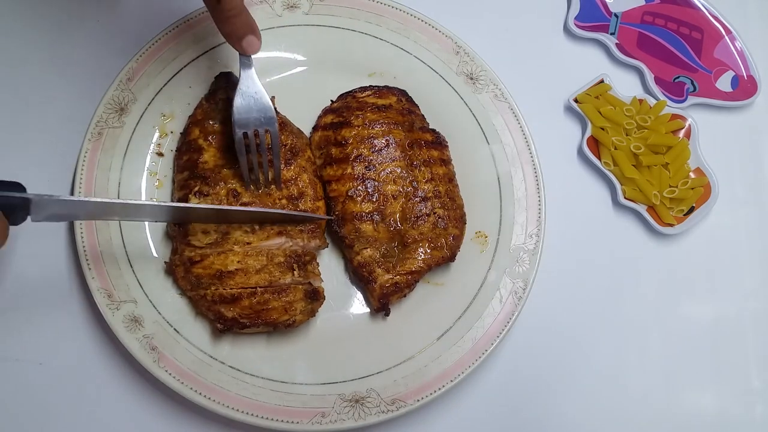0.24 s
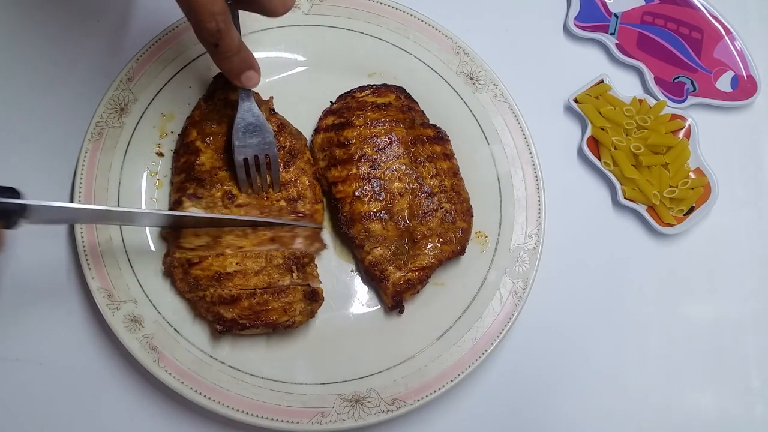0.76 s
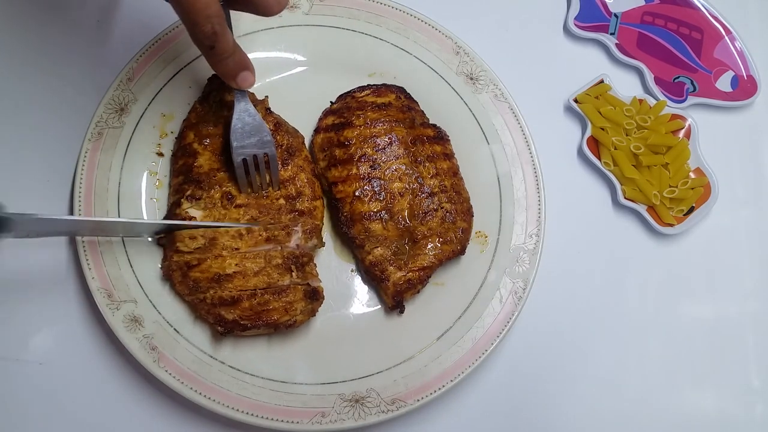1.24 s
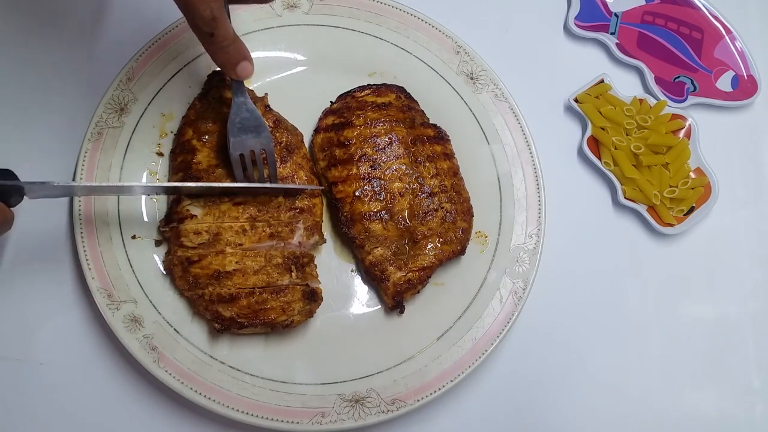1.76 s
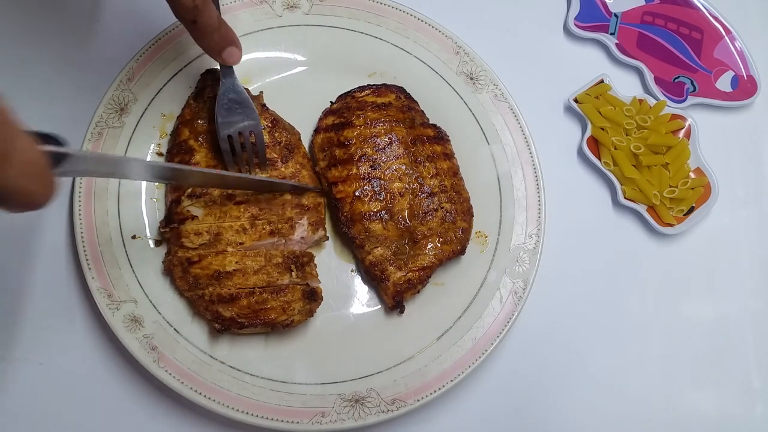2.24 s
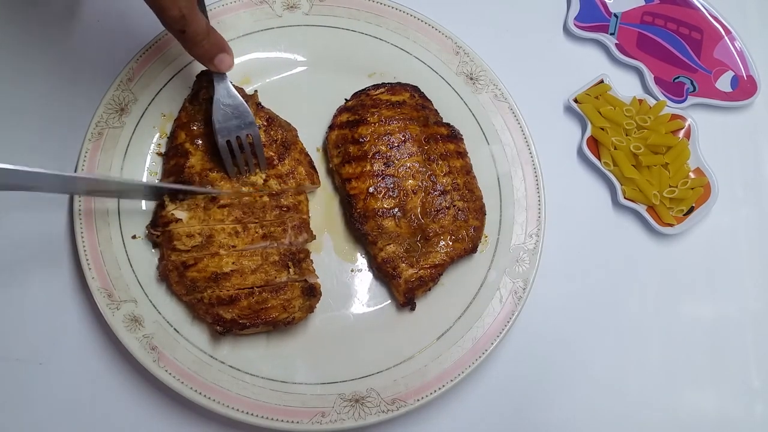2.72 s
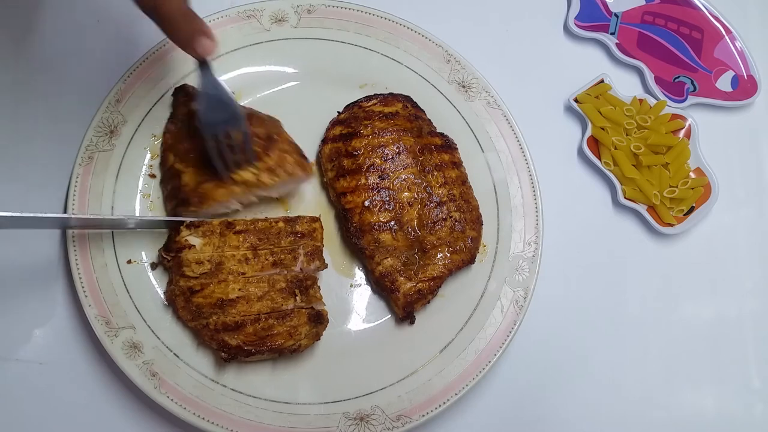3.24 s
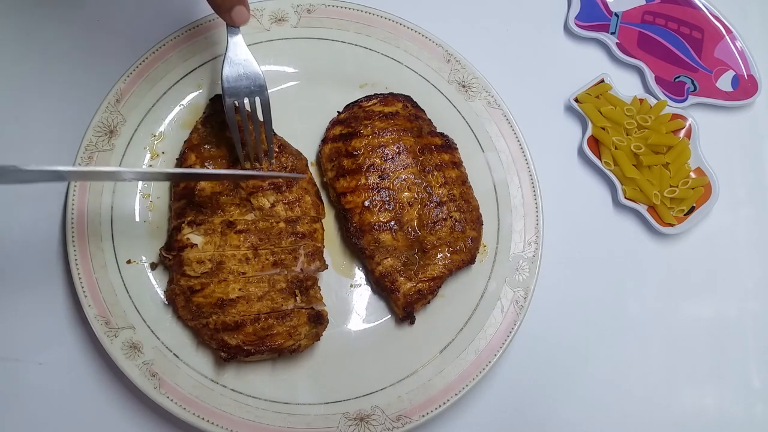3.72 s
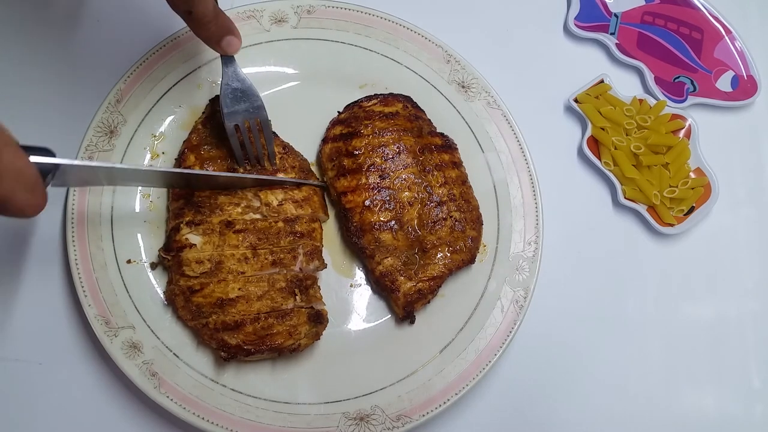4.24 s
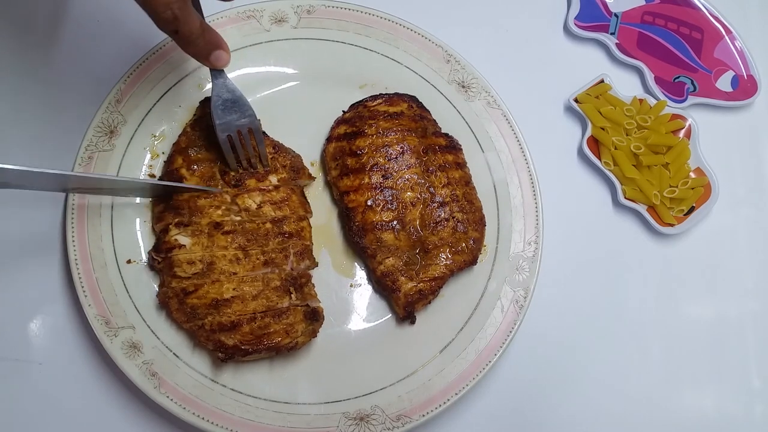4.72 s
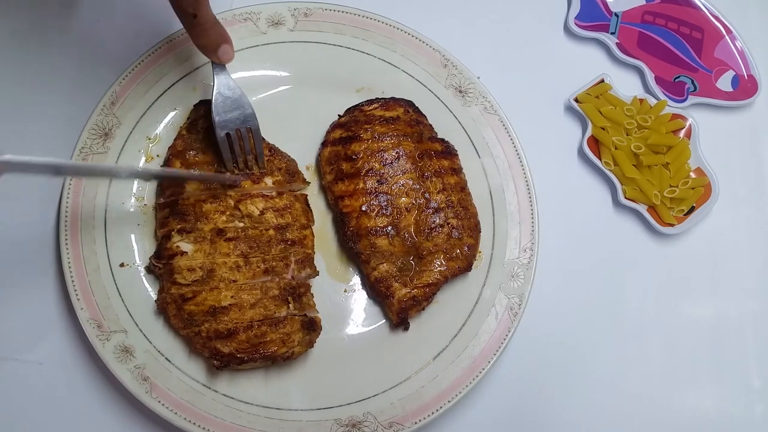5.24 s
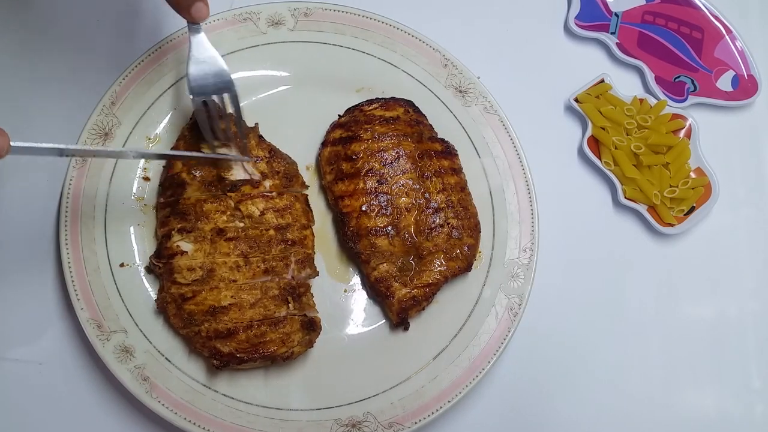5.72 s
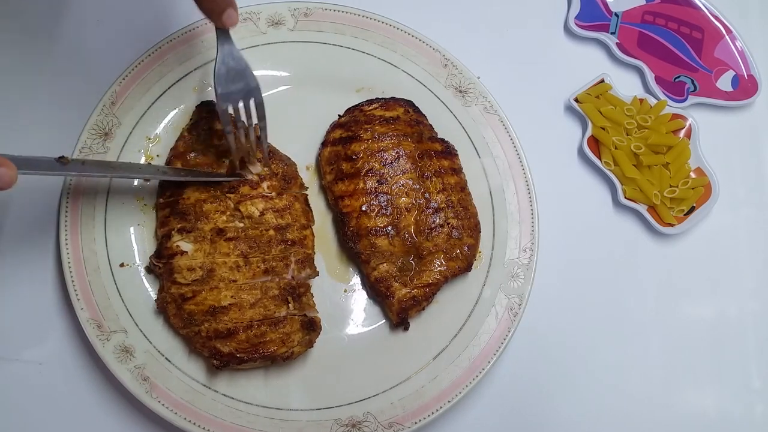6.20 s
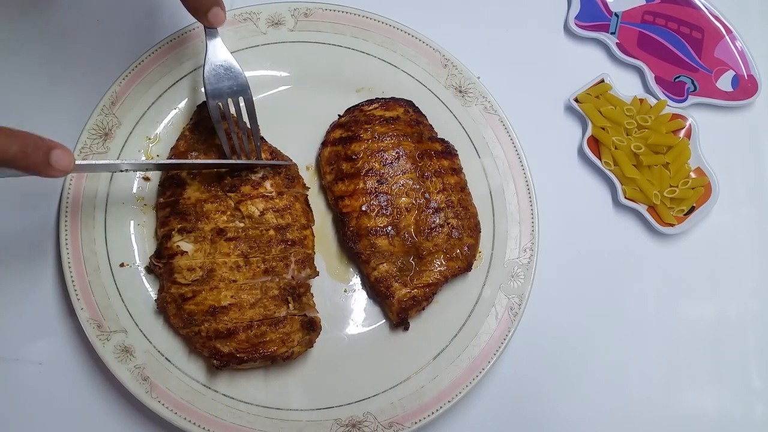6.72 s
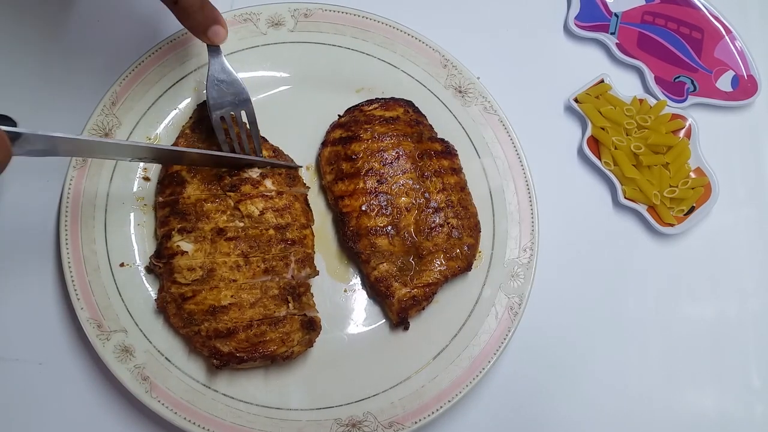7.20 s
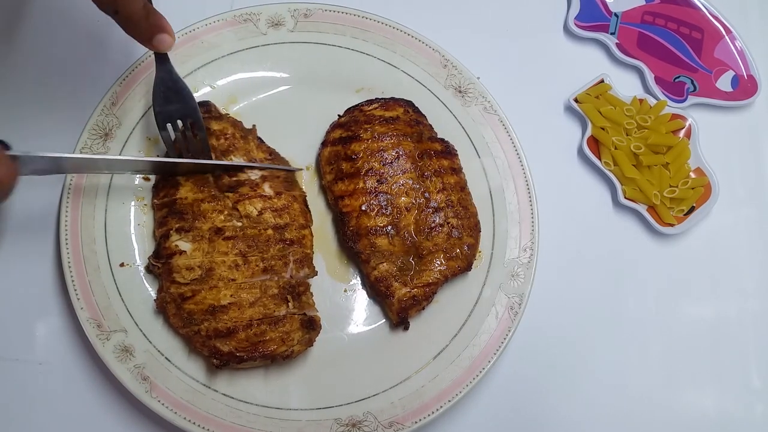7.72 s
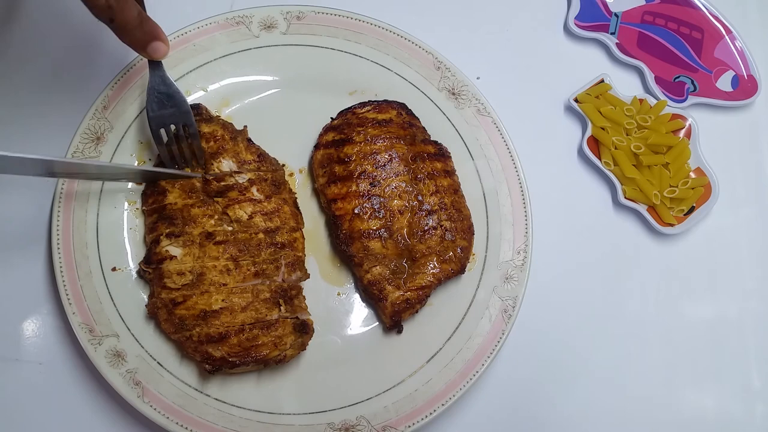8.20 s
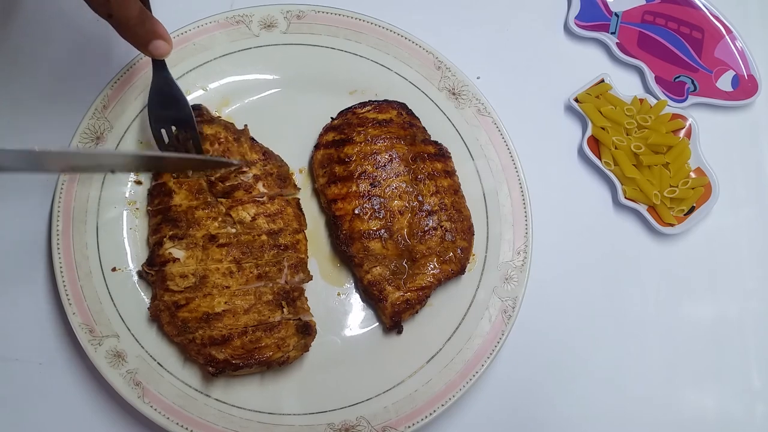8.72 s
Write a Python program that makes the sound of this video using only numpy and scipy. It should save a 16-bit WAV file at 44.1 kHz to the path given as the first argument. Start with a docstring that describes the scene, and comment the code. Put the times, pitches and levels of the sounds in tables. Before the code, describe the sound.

A knife and fork work on cooked chicken on a plate, heard closely with a little bright room echo. Fast rasping saw strokes and ceramic clinks come first, then a near-pause with faint steel ticks over a steady low motor hum and soft air. Quiet cutting resumes with wet snaps, short scrapes, small clinks and dull blade taps, ending on a sharp, heavy knock against the plate's rim.

```python
"""Sawing cooked chicken on a plate

A table knife saws through cooked chicken on a ceramic plate, close by, in a hard-walled kitchen.
Its teeth make strings of tiny clicks that hiss and ring; clinks, taps, fork ticks and a late hard knock
on the rim are fading tones, mostly with a crack of noise. Noise bursts make wet snaps, gliding tones squeaks.
A fan motor hums underneath as steady tones over a rush of air."""
import sys
import numpy as np
from scipy import signal
from scipy.fft import rfft, irfft, next_fast_len
from scipy.io import wavfile

SR = 44100
rng = np.random.default_rng(int(sys.argv[2]) if len(sys.argv) > 2 else 0)


def store_pcm(level_fs):
    """Save levels as 16-bit WAV."""
    pcm = np.round(np.clip(level_fs, -1, 1) * 32767).astype(np.int16)
    wavfile.write(sys.argv[1], SR, np.atleast_2d(pcm).T)


N = 394694
TIME = np.arange(N) / SR
AGE = TIME[:SR // 2]  # seconds since a blow, up to half a second

# All table levels are relative: the functions mix and trim them. A fade time is the time to drop 60 dB.
# strokes of the knife: (start [s], length [s], hiss of teeth [dB], rasp of blade [dB], ring of plate [dB])
STROKES = [(0, 0.032, -63.5, -55, -58), (0.123, 0.029, -66, -58.5, -51), (0.279, 0.04, -60.5, -49.5, -52),
           (0.421, 0.069, -67.5, -55, -51.5), (0.608, 0.049, -53, -43.5, -53),
           (0.748, 0.027, -56, -47.5, -47), (0.884, 0.038, -56.5, -47, -52.5), (1.02, 0.12, -75, -68, -68),
           (3.706, 0.033, -76, -78, -80), (4.03, .04, -77, -78, -80), (4.456, 0.042, -84, -62.5, -74),
           (4.82, 0.058, -76, -83, -82), (5.305, .045, -67.5, -71, -72), (5.385, .03, -75, -54, -57),
           (5.528, 0.015, -72, -48, -60), (6.46, 0.19, -80, -65.5, -72), (7.996, 0.026, -78, -63, -70),
           (8.39, 0.081, -82, -66, -63)]
# blade staying in the meat between strokes: (start [s], end [s], hiss [dB], rasp [dB])
CUTS = [(0, 1.2, -78, -80), (3.7, 6.3, -78, -78), (7.7, 8.65, -80, -85)]
# blade pressed on the plate: (pitch [Hz], level [dB], fade time [s])
BLADE_MODES = [(2164, 3, 0.012), (2430, 2, 0.03), (2790, -9.5, 0.031), (3410, -4, 0.012),
               (4340, -21, 0.035), (5100, -26, 0.011)]
# the plate's ring under the teeth: (pitch [Hz], level [dB], fade time [s])
GLAZE_MODES = [(1483, 0, 0.043)]
# rasp of the teeth: (frequency [Hz], level per Hz [dB])
RASP_COLOUR = [(600, 6.5), (1200, -2), (2400, 8), (3100, -25), (3500, -19), (4700, -19), (7000, -29),
               (12000, -40)]
# hiss of the teeth: (frequency [Hz], level per Hz [dB])
HISS_COLOUR = [(3000, -25), (5500, -10.5), (7000, -17), (8200, -1.5), (8800, -5.5), (9700, -3.5),
               (11400, -9.5), (12500, -6.5), (14300, -8), (16000, -16)]
# cutlery striking bare glaze:
# (time [s], level [dB], contact [s], favoured pitch [Hz], weight [dB], brightness [dB])
CLINKS = [(0.7537, -25, 0.0057, 1590, -0.5, 0.5), (0.81, -32, .0026, 1670, -3, -0.5),
          (0.9896, -29, 0.0035, 2600, -2, -1), (1.312, -39.5, 0.0032, 1600, -3, -12.5),
          (1.761, -52, .0044, 2380, -5, 1.5), (5.349, -40, 0.0019, 2770, 9, 2),
          (5.555, -50, 0.002, 2230, -4, 7), (5.688, -40, .006, 1560, -1, 2.5),
          (5.942, -46, 0.0045, 2500, 5, 9), (8.176, -37.5, 0.0037, 2090, 11, -4.5)]
# the plate, damped by the meat: (pitch [Hz], level [dB], fade time [s])
PLATE_MODES = [(667, -16.5, 0.031), (1210, -9, 0.065), (1455, -2.5, 0.051), (1521, -6.5, 0.035),
               (1660, -14.5, 0.041), (1797, -8, 0.028), (1958, -5.5, 0.046), (2053, -8.5, 0.061),
               (2282, -4, 0.028), (2514, -9, 0.059), (2600, -10.5, 0.029), (2747, -18, 0.092),
               (2890, -12, 0.054), (3604, -13, 0.05), (4560, -22, 0.033), (5300, -28.5, 0.045),
               (6700, -34.5, 0.044), (8070, -34.5, .09)]
# crack of steel on glaze: (frequency [Hz], level per Hz [dB])
CLINK_COLOUR = [(150, -15), (600, 6.5), (1000, 2), (1700, -12), (2700, -2.5), (3200, -8), (4300, -17.5),
                (5500, -31), (10000, -29), (16000, -34)]
# blade tapping down through the meat, which mutes the plate: (time [s], level [dB])
TAPS = [(3.7858, -47), (4.149, -55), (6.0806, -51), (6.123, -47), (6.2931, -51), (6.6074, -54),
        (6.6388, -51), (7.8625, -52), (7.9992, -49), (8.08, -46), (8.1309, -42), (8.1404, -49),
        (8.4487, -49), (8.541, -48), (8.5744, -51), (8.6617, -53)]
# the muted blade: (pitch [Hz], level [dB], fade time [s])
TAP_MODES = [(2000, -1, .012), (2290, -0.5, 0.015), (2760, -7, 0.0094)]
# blade against fork: (time [s], level [dB], contact [s], favoured pitch [Hz], its level [dB])
TICKS = [(1.7605, -43.5, 0.0018, 12900, -8), (2.055, -50, 0.0045, 14500, -19),
         (6.708, -60, 0.0022, 10300, -15), (7.1352, -56.5, 0.025, 12600, -16)]
# thin steel: (pitch [Hz], level [dB], fade time [s])
STEEL_MODES = [(4400, -6, 0.087), (7980, -12, .1), (8500, -1, .1), (9050, -6, .08), (10500, 7, .1),
               (11200, 4, .08), (12650, 2, .1), (14000, -7, .08), (14550, 12, 0.088)]
# crack of steel on steel: (frequency [Hz], level per Hz [dB])
TICK_COLOUR = [(1000, -23), (2300, 4), (3500, -4), (5800, -9), (8200, 4.5), (10000, 0), (13000, 4),
               (16000, -13)]
# knock on the rim, a touch and then the full blow: (time [s], level [dB], crack [dB])
KNOCKS = [(8.7139, -42.5, 10), (8.7165, -24, 6.5)]
# knife, rim and table ringing together: (pitch [Hz], level [dB], fade time [s])
RIM_MODES = [(104.4, -7.5, 0.23), (264, -29, 0.16), (472, -1, 0.024), (616, 1.5, 0.092), (681, -8, 0.16),
             (950, -6, 0.23), (1012, -4, 0.13), (1408, -2, 0.086), (1490, -3.5, 0.096), (1750, -11, .12),
             (2280, -8, .12), (2320, -20, 0.099), (2500, -30, 0.22), (2985, -13, 0.1), (3770, -16.5, 0.13),
             (4790, -18, 0.1), (6060, -30, 0.16), (7010, -38, 0.24), (8600, -30, 0.097), (9500, -21, 0.077),
             (10680, -27.5, 0.27), (12370, -26, .13), (13960, -25, 0.13)]
# clack right at the point of contact: (pitch [Hz], level [dB], fade time [s])
CLACK_MODES = [(2320, 12, 0.015)]
# crack of the knock: (frequency [Hz], level per Hz [dB])
KNOCK_COLOUR = [(60, -12), (130, 3), (400, -1), (900, -2.5), (2400, -0.5), (3400, -5), (6000, -21),
                (9500, -14.5), (13000, -18), (16000, -27)]
# thud of the table: (frequency [Hz], level per Hz [dB])
THUD_COLOUR = [(50, -19), (120, 4), (900, 2), (1800, -9), (4000, -39), (12000, -40)]
# squeaks of the wet blade, one list each: (time [s], pitch [Hz], level [dB])
SQUEAKS = [
    [(5.39, 5300, -70), (5.405, 5300, -62), (5.43, 5300, -73)],
    [(5.515, 5350, -68), (5.54, 5200, -54), (5.565, 4950, -73)],
    [(7.83, 8700, -78), (7.87, 10200, -75), (7.91, 11000, -73), (7.98, 10300, -74), (8.03, 8800, -80),
     (8.09, 8200, -81)],
]
# fibres and juice snapping: (time [s], level [dB], centre [Hz])
SNAPS = [(3.888, -56, 10500), (4.050, -57, 12000), (4.087, -45, 12800), (4.260, -58, 10000),
         (4.439, -51.5, 7100), (4.470, -63, 8000), (4.540, -58, 13500), (4.640, -58, 9500),
         (5.124, -59, 9500), (6.27, -56, 5900)]
# low tones of the fan motor: (pitch [Hz], level [dB])
HUM = [(49, -62), (97.9, -59), (99.9, -59), (122.8, -68), (147, -46.5), (195.8, -58), (216, -63),
       (232.2, -60), (255.4, -58), (285.7, -63), (292.6, -55), (299.4, -60), (309, -63), (322.7, -66),
       (391.6, -57), (408.1, -64), (416.5, -65), (587.8, -62), (661, -70)]
# high tones of the fan motor: (pitch [Hz], level [dB])
WHINE = [(2094, -78), (2536, -86), (2745, -88), (5023, -89), (6560, -96), (7311, -90.5), (8027, -87),
         (9200, -89)]
# moving air: (frequency [Hz], level per Hz [dB])
AIR_COLOUR = [(15, -87), (25, -88.5), (60, -87.5), (85, -73.5), (115, -79), (160, -74.5), (230, -76),
              (290, -73.5), (450, -79), (600, -80.5), (1200, -90), (2100, -102), (3200, -114), (6000, -119),
              (15500, -121)]
# how long the kitchen echoes: (frequency [Hz], fade time [s])
ROOM_FADE = [(150, 0.96), (700, 0.54), (2500, 0.49), (5000, 0.54), (9000, 0.41), (15000, 0.1)]


def stroke(start, end, rise_db_per_s=422, fall_db_per_s=278):
    """The knife gathers speed, runs steadily from start to end, then slows less quickly."""
    before = np.clip(start - TIME, 0, 1)
    after = np.clip(TIME - end, 0, 1)
    return from_db(-rise_db_per_s * before - fall_db_per_s * after)


def sawing(teeth_per_s=2500, grain_db=0.5, grip_db=2.5, blade_db=-4.0, rasp_db=-5.0, hiss_db=-3.0):
    """Teeth catch in quick uneven clicks, which hiss, ring in the blade and shake the plate."""
    hiss_stroke, rasp_stroke, plate_gain = sum(
        np.outer(from_db(levels), stroke(start, start + length)) for start, length, *levels in STROKES)
    hiss_rest, rasp_rest = sum(np.outer(from_db(levels), stroke(start, end)) for start, end, *levels in CUTS)

    caught = rng.random(N) < teeth_per_s / SR
    grain = np.minimum(rng.exponential(1, N), 4)
    size_db = grain_db * grain + grip_db * drift(150)
    teeth = caught * rng.choice([-1, 1], N) * from_db(size_db)

    blade = rms_one(signal.fftconvolve(teeth, ring(BLADE_MODES))[:N])
    plate = rms_one(signal.fftconvolve(teeth, ring(GLAZE_MODES))[:N])
    rasp = from_db(blade_db) * blade + from_db(rasp_db) * coloured(teeth, RASP_COLOUR)
    hiss = from_db(hiss_db) * coloured(teeth, HISS_COLOUR)
    # stroke and resting sound add as powers
    rasp_gain = np.hypot(rasp_stroke, rasp_rest)
    hiss_gain = np.hypot(hiss_stroke, hiss_rest)
    return rasp_gain * rasp + hiss_gain * hiss + plate_gain * plate


def clinks(favour_db=8.0, favour_width_hz=110, crack_db=-5, crack_t60=0.025):
    """An edge stays on the glaze for some milliseconds; each landing colours the plate's ring its own way."""
    out = np.zeros(N)
    for s, db, contact, favoured_hz, weight_db, bright_db in CLINKS:
        # weight acts below a neutral middle, brightness above it
        tilt = [(755, weight_db), (1310, 0), (1950, 0), (2440, bright_db)]
        modes = []
        for hz, level, t60 in PLATE_MODES:
            # pitches that move most under the edge take the most of the blow
            favour = favour_db * np.exp(-((hz - favoured_hz) / favour_width_hz) ** 2)
            modes.append((hz, level + at_hz(tilt, hz) + favour, t60))
        noise = coloured(rng.standard_normal(len(AGE)), CLINK_COLOUR)
        crack = shaped(noise, tilt) * fade(crack_t60, contact)
        add(out, s, from_db(db) * (ring(modes, contact) + from_db(crack_db) * crack))
    return out


def taps(spread_db=1.5):
    """Short dull taps in which only the blade rings."""
    out = np.zeros(N)
    for s, db in TAPS:
        add(out, s, from_db(db) * ring(TAP_MODES, spread_db=spread_db))
    return out


def ticks(crack_t60=0.034, steel_db=-18.5, favoured_t60=0.2):
    """Steel meets steel: a bright crack and a thin ring, in which the point of contact favours one pitch."""
    out = np.zeros(N)
    for s, db, contact, hz, favoured_db in TICKS:
        crack = burst(TICK_COLOUR, crack_t60, contact)
        steel = from_db(steel_db) * ring(STEEL_MODES, contact)
        favoured = ring([(hz, favoured_db, favoured_t60)])
        add(out, s, from_db(db) * (crack + steel + favoured))
    return out


def knock(swell_s=0.00053, crack_t60=0.014, thud_db=-3, thud_t60=0.15):
    """The knife clacks on the rim; the heavy plate and the table under it take a moment to follow."""
    out = np.zeros(N)
    for s, db, crack_db in KNOCKS:
        swell = 1 - np.exp(-AGE / swell_s)
        body = (ring(RIM_MODES) + from_db(thud_db) * burst(THUD_COLOUR, thud_t60)) * swell
        crack = from_db(crack_db) * burst(KNOCK_COLOUR, crack_t60)
        add(out, s, from_db(db) * (ring(CLACK_MODES) + crack + body))
    return out


def squeaks(jitter=0.054, jitter_per_s=2500):
    """The wet blade sticks and slips: a thin gliding tone, rough because its pitch jitters."""
    out = np.zeros(N)
    for rows in SQUEAKS:
        hz, db = in_time(rows)
        rough_hz = hz * (1 + jitter * drift(jitter_per_s))
        phase = 2 * np.pi * np.cumsum(rough_hz) / SR
        sounding = (TIME > rows[0][0]) * (TIME < rows[-1][0])
        out += from_db(db) * np.sin(phase) * sounding
    return out


def snaps(t60=0.01, skirt_db=-26):
    """Tiny wet clicks as the meat parts, each a short burst of noise around one frequency."""
    out = np.zeros(N)
    for s, db, hz in SNAPS:
        band = [(hz / 2, skirt_db), (hz * 0.64, -2), (hz * 1.27, 0), (hz * 2, skirt_db)]
        add(out, s, from_db(db) * burst(band, t60))
    return out


def fan(hum_trim_db=-0.77, whine_trim_db=-3.0, waver=0.054, waver_per_s=4.1, air_db=-48.46):
    """Motor tones whose loudness wavers a little, over the rush of moving air."""
    out = from_db(air_db) * coloured(rng.standard_normal(N), AIR_COLOUR)
    for lines, trim_db in ((HUM, hum_trim_db), (WHINE, whine_trim_db)):
        for hz, db in lines:
            # the root of two gives the sine unit power
            tone = np.sqrt(2) * np.sin(2 * np.pi * (hz * TIME + rng.random()))
            out += from_db(db + trim_db) * (1 + waver * drift(waver_per_s)) * tone
    return out


def kitchen(x, first_echo_s=0.006):
    """Dense echoes off hard walls, made of fading noise bands; the highest treble dies first."""
    centres = np.geomspace(100, 16000, 12)
    white = rfft(rng.standard_normal(len(AGE)))
    hz = np.fft.rfftfreq(len(AGE), 1 / SR)
    tail = np.zeros(len(AGE))
    for centre, share in zip(centres, np.eye(len(centres))):
        # each band overlaps its neighbours
        band = irfft(white * np.interp(hz, centres, share), len(AGE))
        tail += band * fade(at_hz(ROOM_FADE, centre))
    # silent until the first echo, then building up
    tail *= np.clip(AGE / first_echo_s - 1, 0, 1)
    return signal.fftconvolve(x, tail / np.linalg.norm(tail))[:N]


def ring(modes, hold=0, spread_db=0.0):
    """A struck object rings at its own pitches; strengths may vary by chance from blow to blow."""
    out = np.zeros(len(AGE))
    for hz, db, t60 in modes:
        gain = from_db(db + spread_db * rng.normal()) * rng.choice([-1, 1])
        out += gain * np.sin(2 * np.pi * hz * AGE) * fade(t60, hold)
    return out


def burst(spectrum, t60, hold=0):
    """Fading noise stands for the crowd of short-lived pitches that makes a blow crack."""
    return coloured(rng.standard_normal(len(AGE)), spectrum) * fade(t60, hold)


def fade(t60, hold=0, rise=0.00017):
    """A quick rise, held while the contact lasts, then dying away by 60 dB in t60 seconds."""
    return (1 - np.exp(-AGE / rise)) * from_db(-60 * np.maximum(AGE - hold, 0) / t60)


def drift(rate):
    """Smooth chance: random points, `rate` per second, joined by straight lines."""
    knots = rng.standard_normal(int(rate * TIME[-1]) + 2)
    return np.interp(TIME * rate, np.arange(len(knots)), knots)


def coloured(x, spectrum):
    """Give a steady signal a spectrum and unit power."""
    return rms_one(shaped(x, spectrum))


def shaped(x, spectrum):
    """Filter a signal by a table of (frequency [Hz], level [dB])."""
    size = next_fast_len(len(x))
    gain = from_db(at_hz(spectrum, np.fft.rfftfreq(size, 1 / SR)))
    return irfft(rfft(x, size) * gain, size)[:len(x)]


def rms_one(x):
    """Scale to unit power."""
    return x / np.sqrt(np.mean(x ** 2) + 1e-20)


def from_db(db):
    """Turn decibels into a gain."""
    return 10 ** (np.asarray(db) / 20)


def at_hz(points, hz):
    """Read a table between its rows, on a log-frequency axis."""
    table = np.array(points)
    return np.interp(np.log(np.maximum(hz, 1)), np.log(table[:, 0]), table[:, 1])


def in_time(rows):
    """Join the rows of a curve by straight lines in time."""
    s, *columns = np.transpose(rows)
    return [np.interp(TIME, s, column) for column in columns]


def add(track, s, sound):
    """Mix a sound in at a time in seconds."""
    start = round(s * SR)
    track[start:start + len(sound)] += sound[:N - start]


def scene(saw_room_db=-15.0, clink_room_db=-9.0, tick_room_db=-6.0, knock_room_db=-6.5, snap_room_db=-14.0):
    """Everything sits in the middle; each source has its own share of room, and the fan has none."""
    sources = [(sawing() + squeaks(), saw_room_db), (clinks() + taps(), clink_room_db),
               (ticks(), tick_room_db), (knock(), knock_room_db), (snaps(), snap_room_db)]
    direct = sum(sound for sound, room_db in sources)
    room = kitchen(sum(sound * from_db(room_db) for sound, room_db in sources))
    return np.tile(direct + room + fan(), (2, 1))


def record(dry, cutoff_hz=15800):
    """A steep filter removes the very top of the treble."""
    lowpass = signal.ellip(10, .1, 80, cutoff_hz, fs=SR, output="sos")
    return signal.sosfilt(lowpass, dry)


dry = scene()
out = record(dry)
store_pcm(out)
```